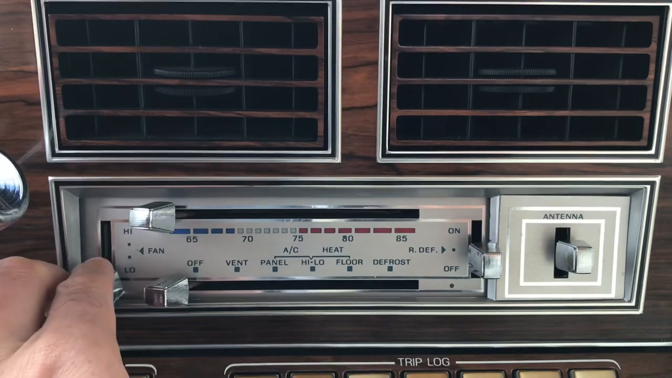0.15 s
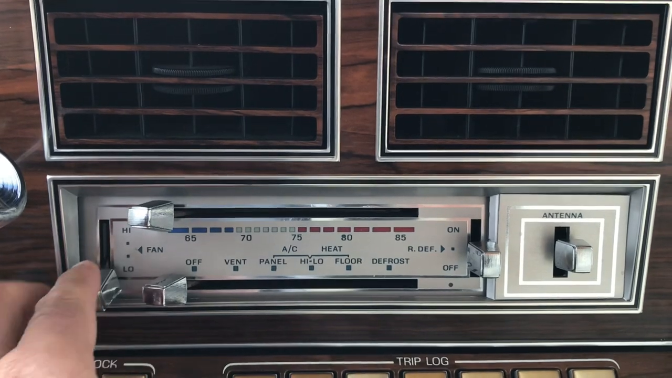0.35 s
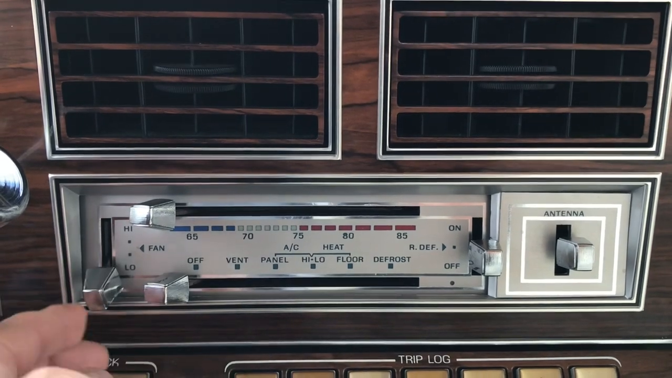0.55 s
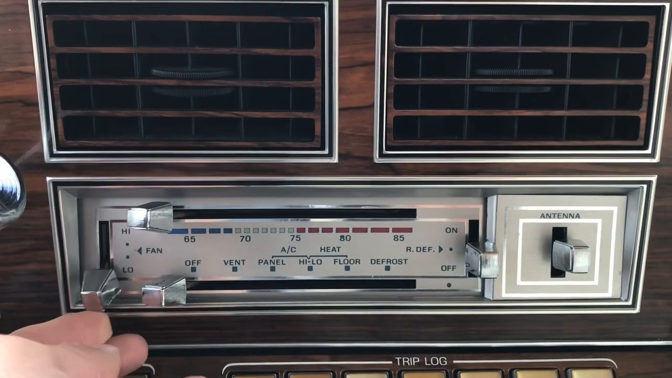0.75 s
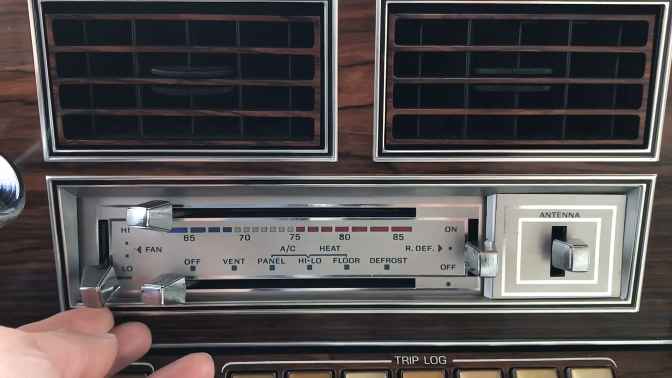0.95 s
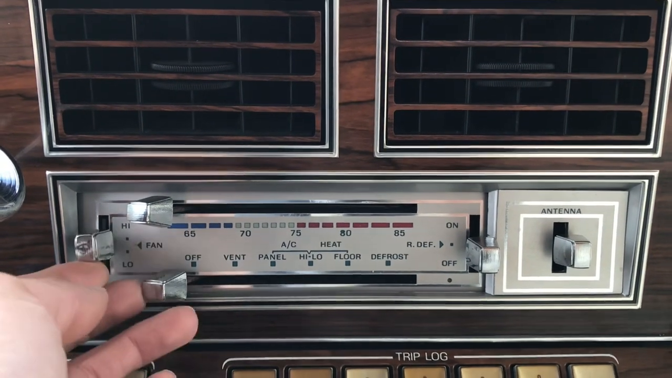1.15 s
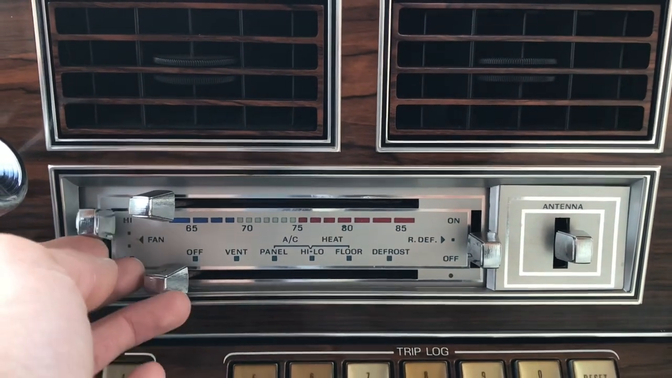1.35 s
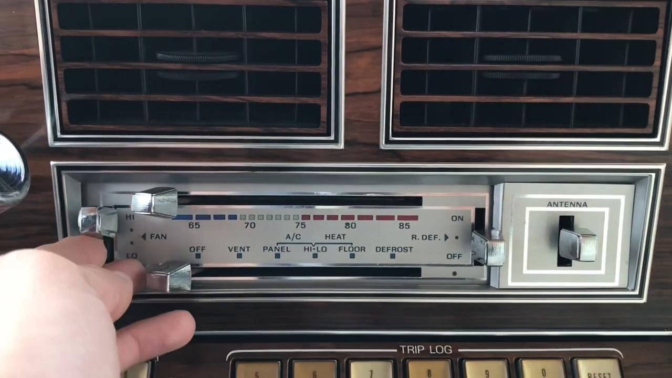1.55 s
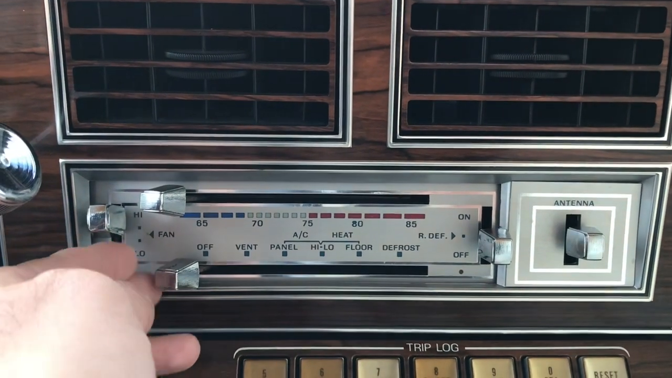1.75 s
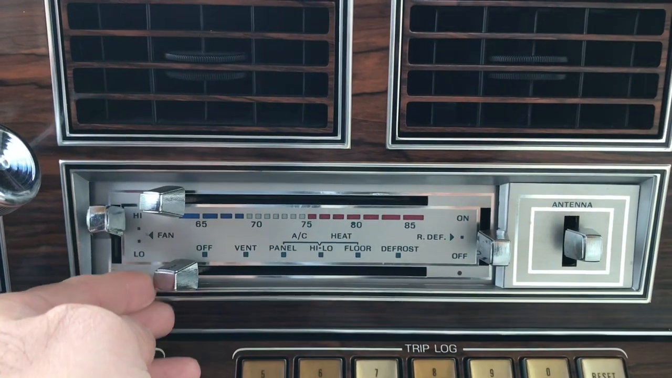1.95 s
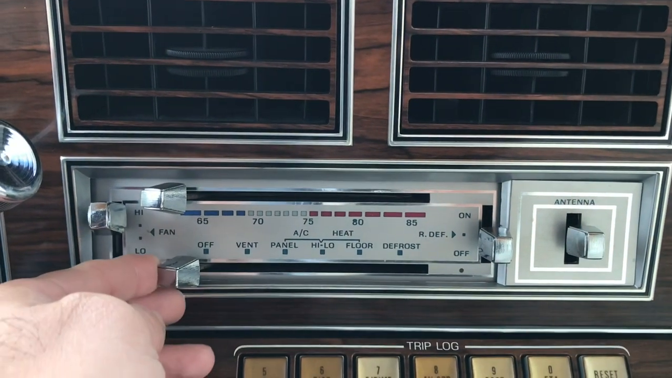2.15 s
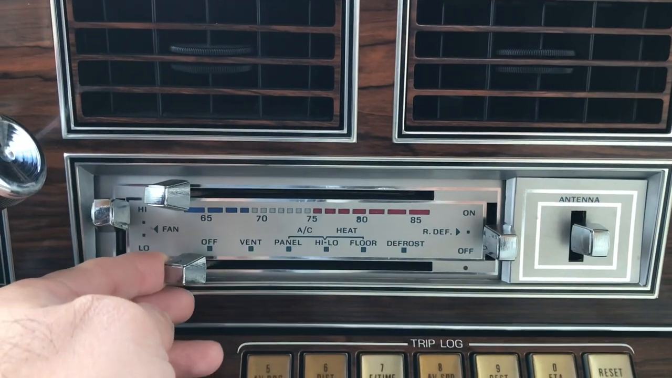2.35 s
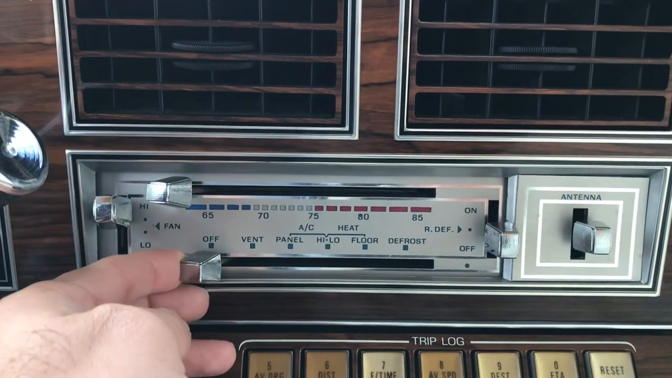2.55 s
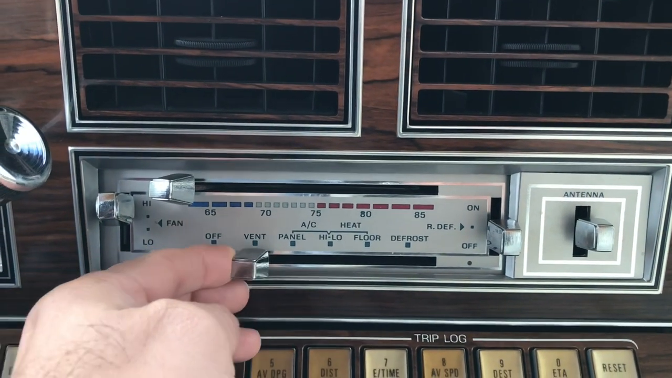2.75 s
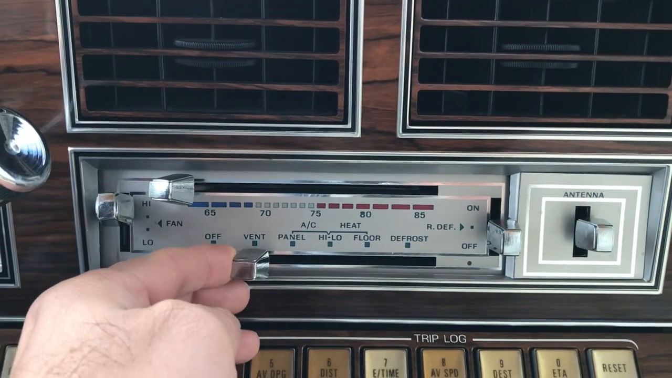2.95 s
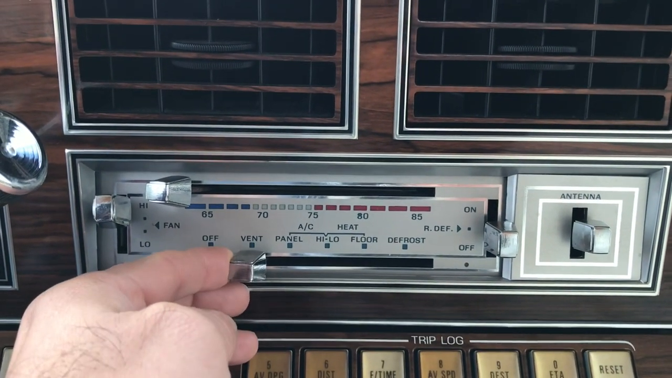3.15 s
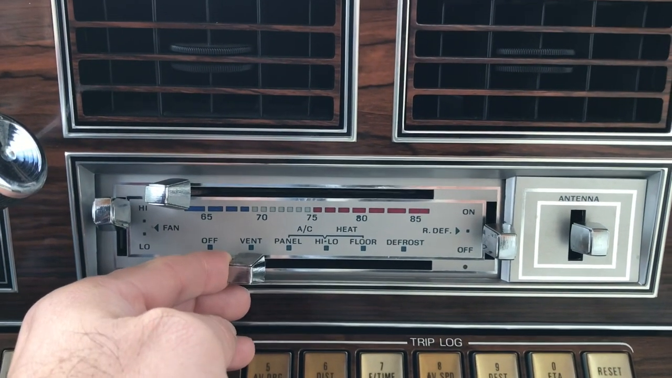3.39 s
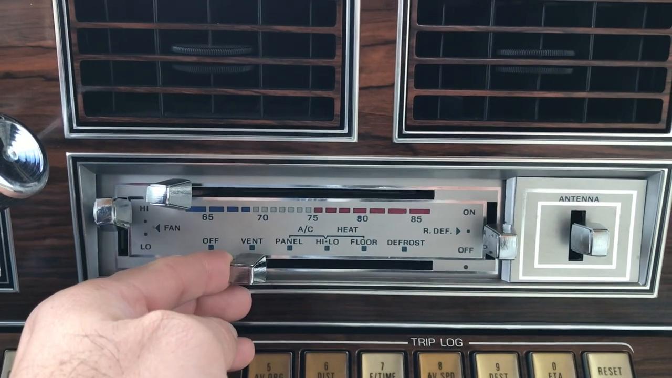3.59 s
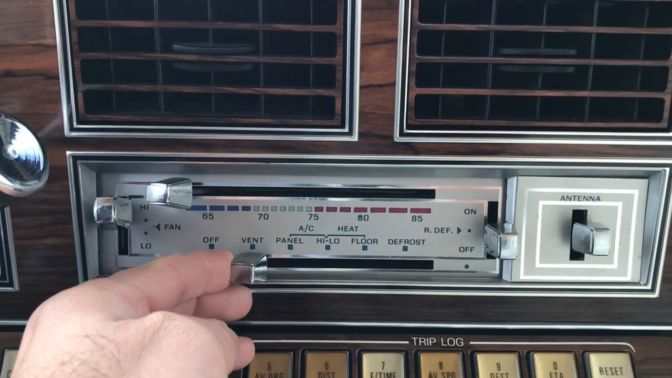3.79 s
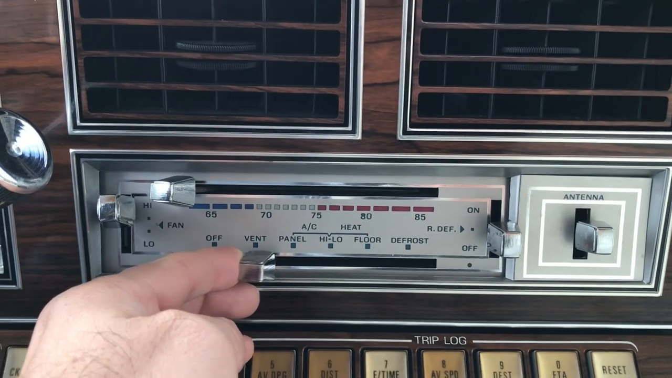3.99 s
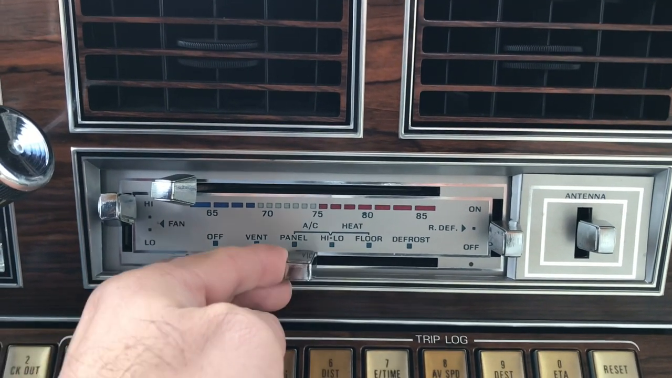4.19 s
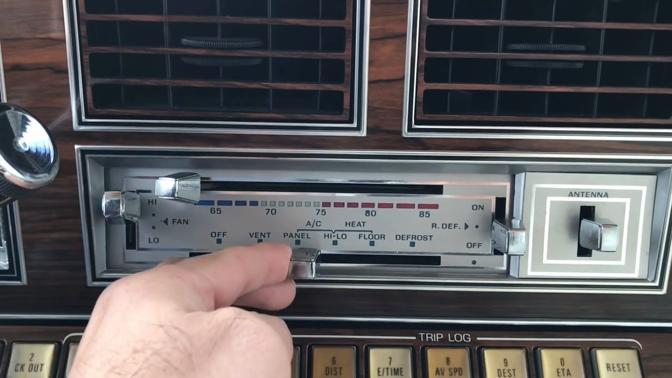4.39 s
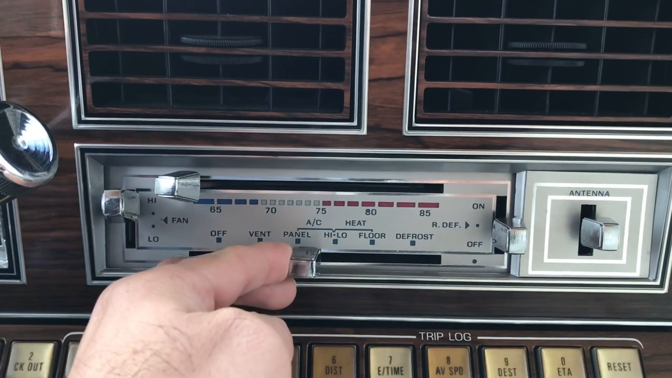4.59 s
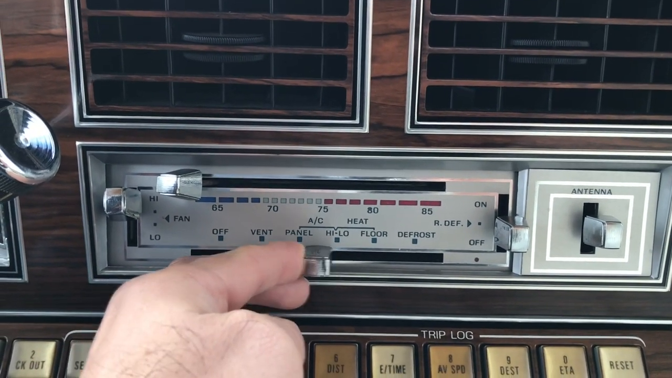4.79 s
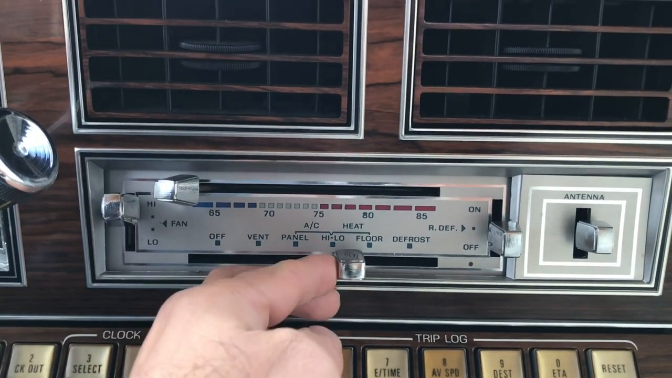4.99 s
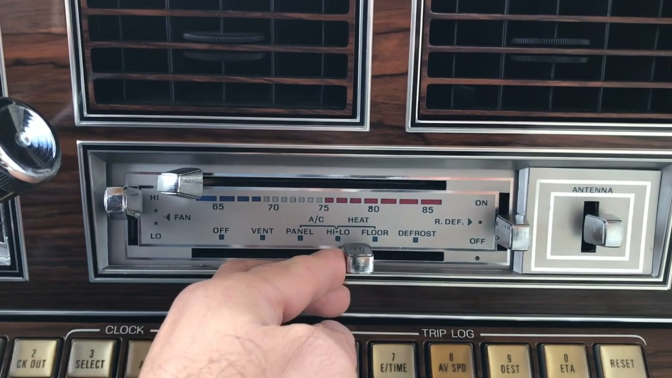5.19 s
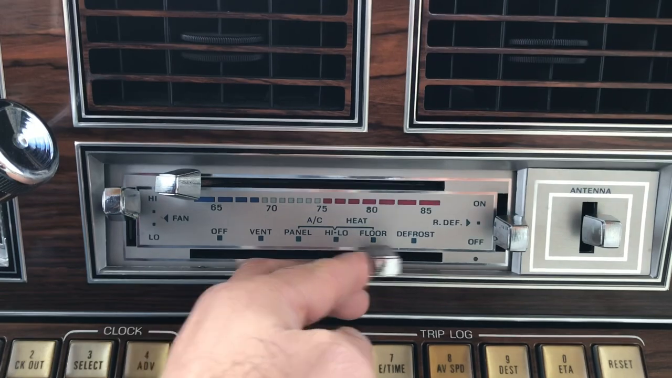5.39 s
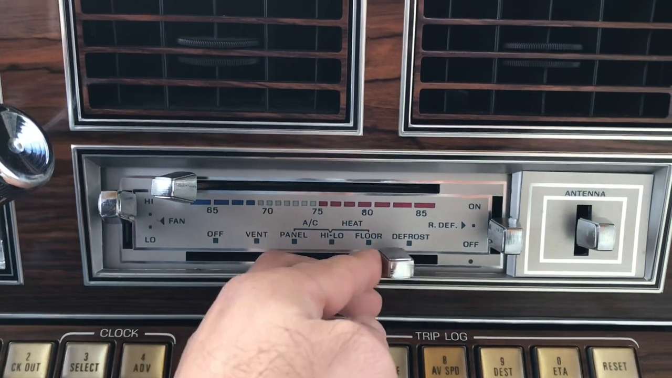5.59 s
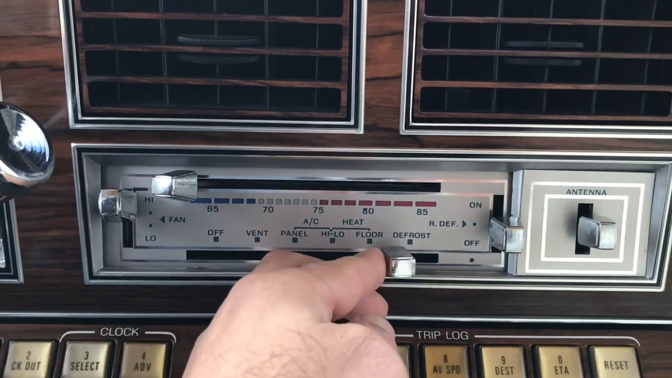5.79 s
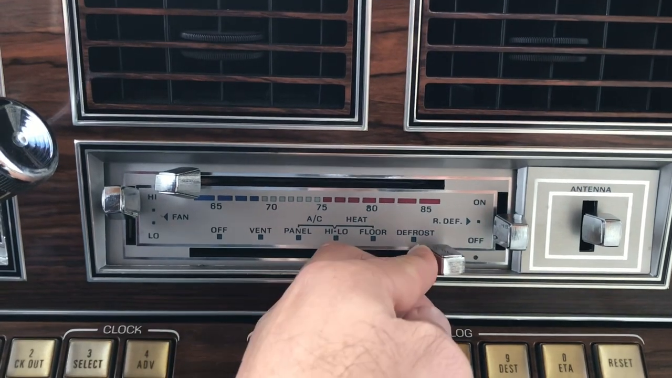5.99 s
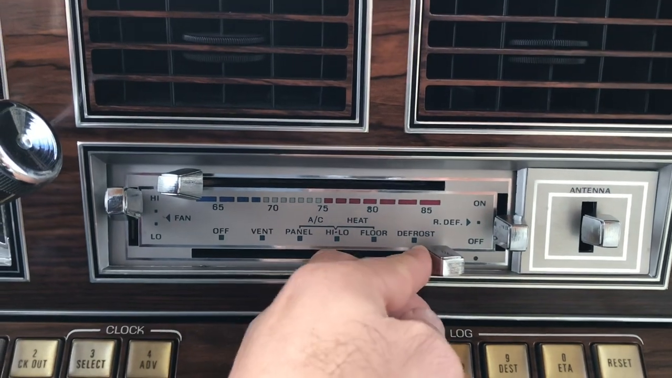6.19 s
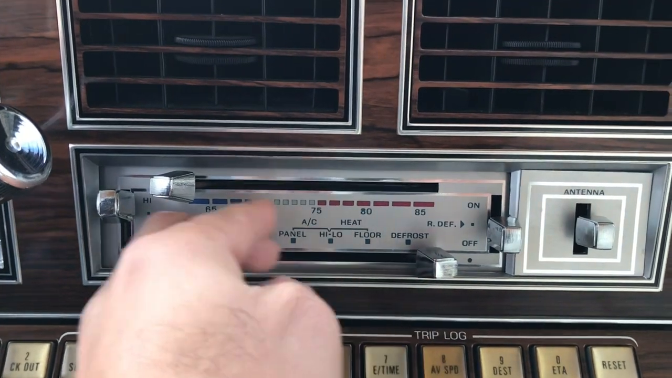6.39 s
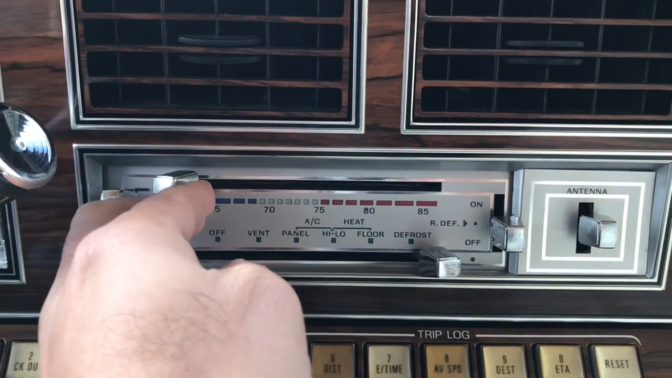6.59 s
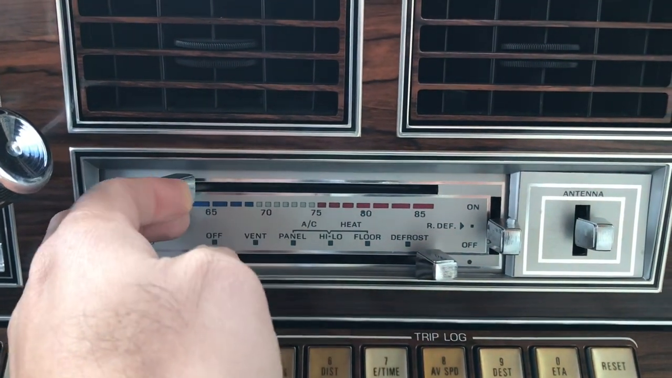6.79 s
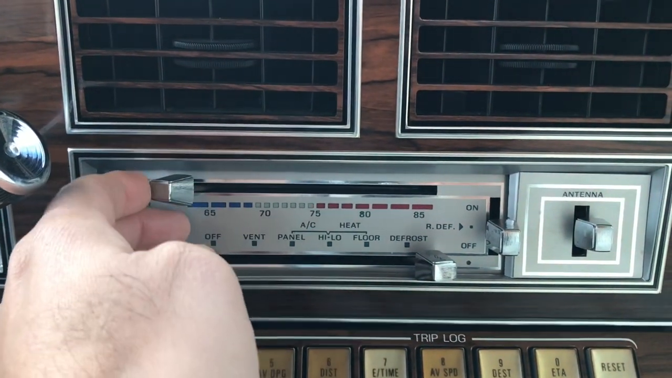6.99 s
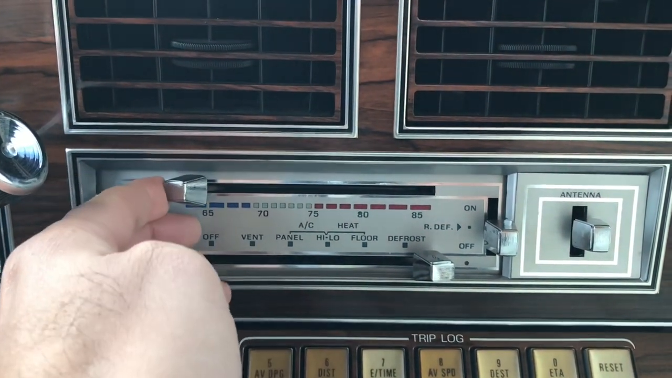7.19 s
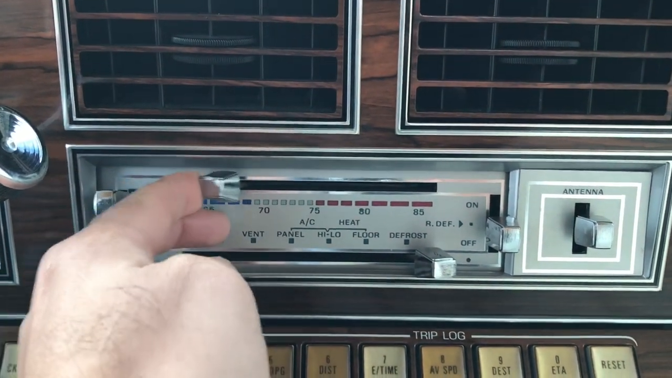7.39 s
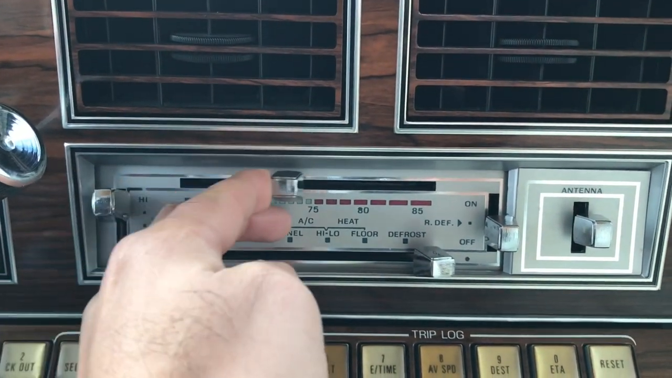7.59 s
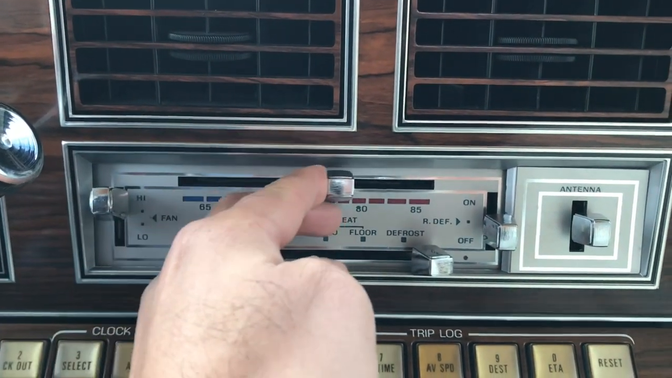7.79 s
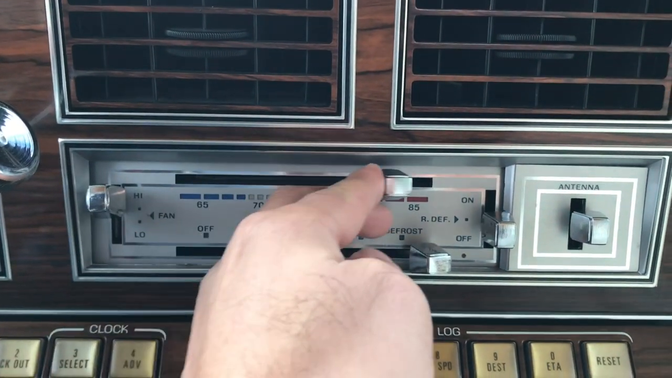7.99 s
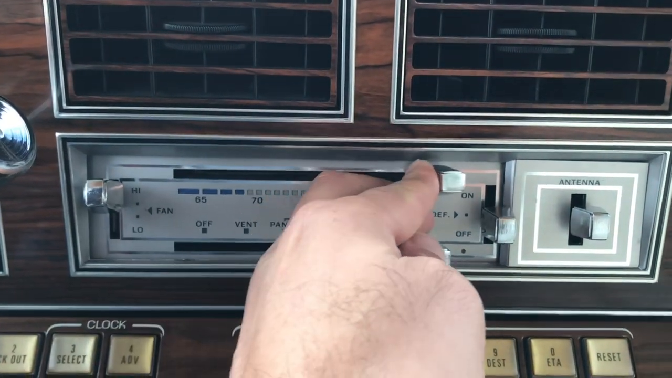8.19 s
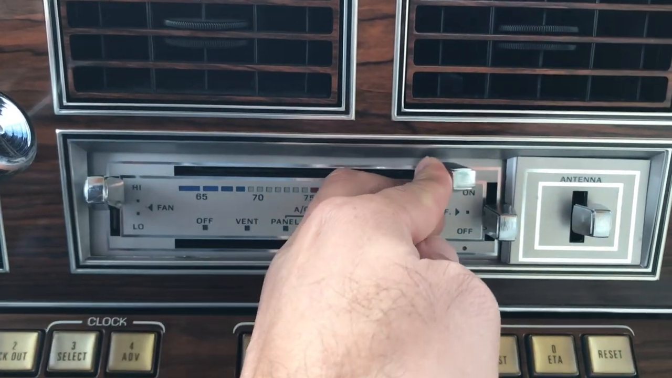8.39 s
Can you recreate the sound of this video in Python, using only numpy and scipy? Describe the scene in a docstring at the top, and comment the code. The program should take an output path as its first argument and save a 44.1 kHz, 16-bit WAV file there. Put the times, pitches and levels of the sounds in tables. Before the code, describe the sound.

A hand works chrome slide levers on a dashboard climate panel, heard closely in a small dry cabin. Bright, hard snaps come first, with near quiet between them, then light ticks and pings. The blower fan swells up with padded flap thumps, settling into a rumbling airflow. Spaced lever clicks, faint scrapes and a final dull knock are heard over it.

```python
"""Sharp snaps, small clicks, chrome pings and soft thumps, then steady rushing air in a closed car cabin.
These are slide levers on a climate panel, heard close up. Snaps and clicks are short noise bursts,
struck metal is a set of dying sine waves, and air doors are short low booms.
Scrapes and creaks are noise broken up by uneven slips. The blower is shaped noise that grows
as the fan spins up, and it runs on while the temperature lever glides across."""
import sys
import numpy as np
from scipy import signal
from scipy.fft import irfft, next_fast_len
from scipy.io import wavfile
from scipy.ndimage import uniform_filter1d

SR = 44100
rng = np.random.default_rng(int(sys.argv[2]) if len(sys.argv) > 2 else 0)


def generate_wav(sig):
    """Save sig (samples, or channels by samples) to the path in sys.argv[1] as 16-bit PCM at SR."""
    pcm = np.round(np.clip(np.atleast_2d(sig).T, -1, 1) * 32767).astype(np.int16)
    wavfile.write(sys.argv[1], SR, pcm)


N = 372644
AGE = np.arange(2 ** 14) / SR  # seconds since a blow

# spectrum shared by detent clicks and the scrape before a snap: [f/Hz, relative level/dB]
DETENT_SPECTRUM = [(200, -12), (700, -5.5), (1500, -4.5), (2600, 3), (3700, -3.5), (4500, 4), (6000, -4.5),
                   (7800, -2.5), (9000, -0.5), (10500, -5.5), (12000, -6), (16000, -9)]
# spectrum of the shaken dashboard: [f/Hz, relative level/dB]
DASH_SPECTRUM = [(100, -16.5), (220, -4.5), (430, -7.5), (700, -4.5), (1000, -0.5), (1900, 3), (2600, -0.5),
                 (4200, -0.5), (6500, -8.5), (8000, -8.5), (12000, -12.5), (16000, -11.5)]
# spectrum of low thuds in the dashboard and ducts: [f/Hz, relative level/dB]
THUD_SPECTRUM = [(25, -20), (60, -2.5), (120, -0.5), (160, -12), (225, 1), (290, -1.5), (430, -16),
                 (600, -7.5), (1200, -33), (4000, -58)]
# resonances and dips of the face plate that colour the clicks: [f/Hz, width/Hz, height/dB]
FACE_PEAKS = [(1120, 66, 2), (1410, 220, -2.5), (1770, 140, 3.5), (2543, 210, 7), (3000, 160, -3.5),
              (3180, 240, 7.5), (3900, 200, -2), (4350, 170, 2), (4840, 180, -7), (5200, 280, 4),
              (5530, 290, -8.5), (6140, 220, 4), (6450, 600, 2.5), (7800, 400, -5), (8300, 200, 4.5),
              (9400, 500, 2.5), (11100, 400, 0.5), (11850, 250, 6.5), (12500, 600, -4.5), (15500, 350, 0)]
# time to fade by 60 dB in dashboard and cabin, before any length factor: [f/Hz, fade/s]
FADE_TIMES = [(60, 0.35), (120, 0.46), (240, 0.05), (500, .1), (1000, 0.087), (2500, 0.067), (6000, 0.082),
              (16000, 0.071)]


def fan_switch():
    """The sprung contact scrapes over its crest, snaps, rings the face plate and shakes the dashboard."""
    # snaps; level is before the contact/dashboard balance:
    # [t/s, level/dB, brightness/(dB per octave), plate ring/dB, thud/dB]
    snaps = [(0.0410, -14.5, 2.5, -19, -32), (0.057, -14, 1.5, -24, -37.5), (0.0641, -14, 0.7, -19, -29.5),
             (1.2023, -14.5, -0.5, -28, -33.5), (1.2235, -15.5, -1.5, -29, -33),
             (1.4055, -14.5, 1, -39, -29)]
    # spectrum of the snapping contact: [f/Hz, relative level/dB]
    snap_spectrum = [(200, -29), (650, -22), (1200, -7), (2000, -3), (3000, -1), (4500, 0.5), (6200, -0.5),
                     (7800, -5.5), (10000, -6.5), (12000, -2), (13500, -8.5), (16000, -3.5)]
    # ringing modes of the switch and its metal plate: [f/Hz, relative level/dB]
    plate_modes = [(700, -12.5), (800, -4), (940, -3), (1000, -6), (1135, 3), (1200, -3.5), (1620, -5.5),
                   (1685, 0), (2507, 3), (2570, -7), (3140, -4), (3235, -6), (3900, -3), (4035, 0),
                   (4650, -5), (5100, -1), (5378, -1), (5900, -2), (5950, -1.5), (6400, -6.5), (6772, -7.5),
                   (8450, -7.5), (9590, -7), (10190, -9.5), (12050, -8.5), (15500, -8)]
    crest_lead_s, crest_db = 0.004, -24.5  # scrape before the snap, level relative to it
    out = np.zeros(N)
    modes = [(hz, db, 0.9 * read(FADE_TIMES, hz)) for hz, db in plate_modes]
    for s, db, tilt_db, plate_db, thud_db in snaps:
        contact = crack(snap_spectrum, tilt_db, rise=0.0014, life=0.0022, peaks=FACE_PEAKS)
        dash = tail(DASH_SPECTRUM, tilt_db, rise=0.0013, peaks=FACE_PEAKS)
        scrape = crack(DETENT_SPECTRUM, -1, rise=0.003, life=0.005, peaks=FACE_PEAKS)
        add(out, s - crest_lead_s, amp(db + crest_db) * scrape)
        add(out, s, amp(db) * (amp(4.0) * contact + amp(-7.5) * dash))
        add(out, s, amp(plate_db) * ring(modes, rise=0.00049, vary_db=2.5))
        add(out, s, amp(thud_db) * tail(THUD_SPECTRUM, 0, rise=0.014))
    return out


def detent_clicks():
    """A lever drops into a detent with a click, and the linkage knocks behind it a moment later."""
    # [t/s, click level/dB, brightness/(dB per octave), knock level/dB, knock pitch/Hz]
    detents = [(1.0515, -50.5, -4, -39, 1120), (1.6432, -55, 8, -41, 1170), (1.8151, -50, 1, -68, 935),
               (2.5159, -44.5, -8, -49, 890), (2.8129, -43.5, -6, -54, 1020), (2.822, -43.5, -16, -54, 980),
               (2.8418, -35, -5.5, -44.5, 740), (4.2144, -34.5, -2, -38, 1110),
               (4.27, -44, -5.5, -50, 1000), (4.9334, -33.5, 2, -33, 830), (4.9945, -34.5, -10, -34, 1450),
               (5.5097, -35.5, 1.3, -34.5, 890), (6.051, -51.5, 1, -33, 960),
               (6.5828, -50, -1.5, -41.5, 1000), (7.242, -32, 4, -32.5, 904),
               (8.3461, -38, -15.5, -28.5, 976)]
    knock_lag_s = 0.00188
    out = np.zeros(N)
    for s, db, tilt_db, knock_db, hz in detents:
        contact = crack(DETENT_SPECTRUM, tilt_db, rise=0.00052, life=0.0024, peaks=FACE_PEAKS)
        after = tail(DETENT_SPECTRUM, tilt_db - 0.8, rise=0.0016, length=0.67, peaks=FACE_PEAKS)
        add(out, s, amp(db) * (contact + amp(-1.5) * after))
        add(out, s + knock_lag_s, knock(knock_db, hz))
    return out


def knob_taps():
    """A chrome knob lightly taps its slot: a tick and a ping, then a knock from the linkage."""
    # [t/s, ring level/dB, tick level/dB, tick brightness/(dB per octave), knock level/dB, knock pitch/Hz]
    taps = [(2.3690, -27.5, -33, 4.5, -51.5, 1095), (2.4877, -24.5, -36, 2, -31.5, 1185),
            (7.2423, -50, -30.5, 3.5, -30, 1616), (7.352, -48.5, -52, -9, -50, 1390),
            (7.524, -47, -46, -6, -55, 990), (7.8531, -34, -33.5, -5, -47, 1000)]
    # ringing modes of a knob: [f/Hz, relative level/dB, time to fade by 60 dB/s]
    knob_modes = [(4620, -2, 0.012), (4650, -5, 0.013), (5100, 4.5, 0.016), (4860, -16, 0.0065),
                  (6540, -17, 0.028), (7720, -17, 0.061), (9630, -3, 0.015), (11260, -12, 0.023),
                  (14100, -11, 0.042), (15100, -16, .04), (15200, -13, .045)]
    # spectrum of the contact tick: [f/Hz, relative level/dB]
    tick_spectrum = [(1000, 12), (3500, -23), (4800, -14), (6500, 12.5), (9300, 3), (10500, -9),
                     (12000, -12), (15000, 10)]
    knock_lag_s = 0.0045
    out = np.zeros(N)
    for s, ring_db, tick_db, tilt_db, knock_db, hz in taps:
        tick = crack(tick_spectrum, tilt_db, rise=0.00098, life=0.0014)
        dash = tail(DASH_SPECTRUM, 1.7, rise=0.002, length=0.93, peaks=FACE_PEAKS)
        ping = ring(knob_modes, rise=0.00066, vary_db=7)
        add(out, s, amp(ring_db) * (ping + amp(-21) * dash) + amp(tick_db) * tick)
        add(out, s + knock_lag_s, knock(knock_db, hz))
    return out


def slack_knocks():
    """A lever takes up its slack or meets its stop, and the linkage knocks."""
    # [t/s, level/dB, main pitch/Hz]
    knocks = [(0.0661, -21.5, 1490), (0.071, -29, 764), (0.412, -51.5, 1160), (0.882, -56.5, 1190),
              (1.022, -54.5, 1186), (1.056, -44, 556), (1.237, -33, 864), (1.409, -25, 570),
              (1.760, -52, 1150), (4.9362, -40, 2670)]
    out = np.zeros(N)
    for s, db, hz in knocks:
        add(out, s, knock(db, hz))
    return out


def knock(db, hz):
    """The hollow linkage rings behind the panel."""
    # ringing modes of the linkage: [multiple of the main pitch, relative level/dB, time to fade by 60 dB/s]
    linkage_modes = [(.62, -6, 0.04), (.9, -6.5, 0.058), (1, 1, 0.05), (1.12, -5, .04), (1.3, -23, 0.09),
                     (1.47, -6, 0.028), (1.77, -20, 0.049)]
    # spectrum of the panel's answer: [f/Hz, relative level/dB]
    knock_spectrum = [(100, -9), (300, 5), (600, -2), (1100, 0), (1800, -6.5), (3000, -11), (6000, -28),
                      (16000, -42)]
    hollow = ring(linkage_modes, rise=0.0015, pitch=hz, vary_db=1.5)
    return amp(db) * (hollow + amp(-6) * tail(knock_spectrum, 0, rise=0.002, length=0.85))


def rubbing():
    """A moving lever scrapes its slot in fine, uneven slips: short pushes, and one long glide."""
    # friction builds as a lever is pushed, until it gives way: [t when it gives/s, level/dB, build-up/s]
    rubs = [(2.85, -57, 0.091), (4.215, -51.5, .04), (4.941, -46.5, 0.028), (5.52, -52.5, 0.049),
            (6.045, -53, 0.056), (7.529, -55.5, 0.07), (7.85, -63, 0.083)]
    # spectrum of the scrape: [f/Hz, relative level/dB]
    rub_spectrum = [(200, -14), (1000, 20), (2000, 1), (5000, 5), (7000, -1.5), (9000, 0.5), (10500, -4.5),
                    (12500, -2), (14000, -8), (15000, -2), (16000, -13)]
    # resonances of the long glide: [f/Hz, width/Hz, height/dB]
    slide_peaks = [(9400, 1200, 3), (15100, 900, 4)]
    slips = amp(2.6 * unit(uniform_filter1d(rng.standard_normal(N), size=90)))
    pushes = sum(amp(db) * envelope(s, build, 0, release=0.012) for s, db, build in rubs)

    # the temperature lever has no detents; finger pressure varies slowly along its stroke
    slide_db, uneven_db = -64, 2.5
    grip = noise([(1, 0), (6, 0), (15, -20), (60, -80), (400, -120)], N)
    stroke = envelope(7.52, attack=0.05, hold=0.71, release=0.13)
    glide = amp(slide_db + uneven_db * grip) * stroke

    push_scrape = unit(slips * noise(rub_spectrum, N))
    glide_scrape = unit(slips * noise(rub_spectrum, N, peaks=slide_peaks))
    return pushes * push_scrape + glide * glide_scrape


def creak(slip_hz=110):
    """The fan lever creaks under the finger: quick, uneven slips pulse noise with its resonances."""
    # the finger leans on the lever or lets go: [t/s, level/dB, attack/s, hold/s]
    creaks = [(1.202, -59.5, .016, .005), (1.82, -53.5, .004, 0.033)]
    # resonances of the creak: [f/Hz, width/Hz, height/dB]
    creak_peaks = [(960, 100, 19), (1256, 220, 5.5), (1720, 150, 11.5), (2300, 200, -2.5),
                   (3240, 400, 13.5)]
    wander = unit(uniform_filter1d(rng.standard_normal(N), size=300))
    turns = np.cumsum(slip_hz * (1 + 0.26 * wander)) / SR
    slips = unit(0.5 + np.exp(-(turns % 1) / 0.3))
    spectrum = [(200, 6), (700, -3.0), (1200, 3.5), (3300, -6.0), (6000, -11.0), (12000, -16.5)]
    body = noise(spectrum, N, peaks=creak_peaks)
    pressure = sum(amp(db) * envelope(s, attack, hold, release=0.024) for s, db, attack, hold in creaks)
    return pressure * slips * body


def air_doors():
    """Each padded flap lands with a soft boom in the ducts."""
    # level is before the boom/thud balance: [t/s, level/dB, pitch/Hz]
    doors = [(2.758, -40.5, 99), (2.892, -39.5, 99), (2.943, -37, 107), (3.157, -36.5, 80.5),
             (3.197, -32, 58)]
    out = np.zeros(N)
    for s, db, hz in doors:
        boom = np.sin(2 * np.pi * hz * AGE) * (1 - np.exp(-AGE / 0.0056)) * np.exp(-AGE / 0.017)
        thud = tail(THUD_SPECTRUM, -1.7, rise=0.0049)
        add(out, s, amp(db) * (amp(11.0) * boom + amp(-12.5) * thud))
    return out


def blower(level_db=-34, flutter_db=0.9, rush_db=-0.5):
    """The fan gathers speed; its rush grows with speed more steeply than its rumble."""
    # spectrum of the moving air: [f/Hz, relative level/dB]
    air_spectrum = [(25, -37), (45, -15.5), (60, 0.5), (100, -1.5), (145, -10.5), (220, -10.5),
                    (330, -17.5), (470, -29), (700, -28.5), (1100, -29.5), (2400, -36), (3300, -44),
                    (6500, -51.5), (8000, -59), (16000, -71.5)]
    # cabin and duct resonances and dips: [f/Hz, width/Hz, height/dB]
    duct_peaks = [(121.3, 6.1, 10), (176.5, 6.1, -7.5), (201.9, 30.3, 6.5), (237.2, 7.8, 5.5),
                  (252, 17.4, -6), (292, 13, 3), (389.4, 11.5, 4), (575, 270, 10), (852, 27, 4.5),
                  (1786, 32, -10), (1940, 64, 6.5), (2210, 47, 6.5), (4400, 280, 1), (12400, 580, 8)]
    on_s, spin_up_s, creep_per_s = 2.793, 0.41, 0.006  # it keeps creeping faster after the run-up
    running = np.maximum(np.arange(N) / SR - on_s, 0)
    speed = np.tanh(running / spin_up_s) * (1 + creep_per_s * running)
    air = noise(air_spectrum, N, peaks=duct_peaks)
    rumble = signal.sosfiltfilt(signal.butter(2, 350, fs=SR, output="sos"), air)
    eddies = noise([(1, 0), (8, -3), (30, -12), (100, -40), (400, -100)], N)  # slow flutter
    rush = (air - rumble) * amp(rush_db + flutter_db * eddies)
    return amp(level_db) * (rumble * speed ** 1.6 + rush * speed ** 3)


def cabin():
    """Faint outside noise, booming in the cabin's lowest air mode, with one swell of the boom."""
    # spectrum of the faint steady noise: [f/Hz, relative level/dB]
    quiet_spectrum = [(25, -11.5), (50, -3), (70, -1.5), (120, -3), (160, -10), (300, -16.5), (500, -24.5),
                      (900, -25), (1600, -33.5), (4000, -37), (9000, -39.5), (10500, -43), (12500, -35.5),
                      (16000, -37.5)]
    rumble_db, swell_db = -65, 9.5
    boom = noise([(20, -50), (55, -18), (70, 0), (85, -16), (200, -60), (1000, -110)], N)
    swell = envelope(1.2, attack=0.13, hold=1.1, release=0.13)
    return amp(-59.0) * noise(quiet_spectrum, N) + amp(rumble_db + swell_db * swell) * boom


def crack(colour, tilt_db, rise, life, peaks=()):
    """The contact itself: a burst of noise a few milliseconds long."""
    shape = (1 - np.exp(-(AGE / rise) ** 2)) * np.exp(-AGE / life)
    return noise(colour, len(AGE), tilt_db, peaks) * shape / shape.max()


def tail(colour, tilt_db, rise, length=1, peaks=()):
    """Noise for countless panel modes and cabin reflections; each pitch fades at its own rate."""
    hz, t, z = signal.stft(noise(colour, len(AGE), tilt_db, peaks), SR, nperseg=256)
    t60 = length * read(FADE_TIMES, hz)[:, None]
    z = z * np.exp(-np.log(1000) * t / t60)
    return signal.istft(z, SR)[1][:len(AGE)] * (1 - np.exp(-AGE / rise))


def ring(modes, rise, pitch=1, vary_db=2):
    """Dying sine waves; each blow lands a little differently and shares its energy anew."""
    hz, db, t60 = np.transpose(modes)[:, :, None]
    size = amp(db + vary_db * rng.standard_normal(db.shape))
    waves = np.sin(2 * np.pi * (hz * pitch * AGE + rng.random(hz.shape)))
    dying = waves * np.exp(-np.log(1000) * AGE / t60)
    total = (size * dying).sum(0) / np.sqrt((size ** 2).sum() / 2)
    return total * (1 - np.exp(-AGE / rise))


def noise(colour, size, tilt_db=0, peaks=()):
    """Noise of rms 1 with a spectrum, resonances, and a tilt per octave well above 500 Hz."""
    padded = 2 * next_fast_len(size // 2 + 1, True)
    hz = np.fft.rfftfreq(padded, 1 / SR)
    db = read(colour, hz) + tilt_db * np.log2(1 + hz / 500)
    for centre, width, height in peaks:
        db = db + height / (1 + (2 * (hz - centre) / width) ** 2)
    random_phase = np.exp(2j * np.pi * rng.random(len(hz)))
    return unit(irfft(amp(db) * random_phase, padded)[:size])


def envelope(s, attack, hold, release):
    """Grows exponentially to 1 at s, holds, then dies away."""
    t = np.arange(N) / SR - s
    growth = np.minimum(t, 0) / attack
    decay = np.maximum(t - hold, 0) / release
    return np.exp(np.maximum(growth - decay, -30))


def amp(db):
    """Turns decibels into a loudness factor."""
    return 10 ** (np.asarray(db) / 20)


def unit(x):
    """Scales to rms 1."""
    return x / np.sqrt(np.mean(x ** 2) + 1e-20)


def read(points, hz):
    """A table's value at hz, on a log-frequency axis."""
    f, value = np.transpose(points)
    return np.interp(np.log(hz + 1), np.log(f + 1), value)


def add(mix, s, sound):
    """Mixes a sound in at s seconds."""
    part = mix[max(round(s * SR), 0):][:len(sound)]
    part += sound[:len(part)]


def scene():
    """All sources together, in one channel."""
    levers = detent_clicks() + knob_taps() + slack_knocks()
    friction = creak() + rubbing()
    return (fan_switch() + levers + friction + air_doors() + blower() + cabin())[None]


def record(dry, hold=0.415, hiss_db=-61):
    """A loud peak holds the recorder's noise gate open and lets its hiss through; soft overload; band limit."""
    # spectrum of the hiss: [f/Hz, relative level/dB]
    hiss_spectrum = [(100, 17), (300, 9.5), (700, 1.5), (4000, -0.5), (7000, -3), (9500, -4), (10400, -7.5),
                     (11500, -4.5), (16000, -7.5)]
    edge_hz = 16100
    loud = abs(dry[0]) > 0.17
    t = np.arange(N) / SR
    since_loud = t - np.maximum.accumulate(np.where(loud, t, -1))
    gate = uniform_filter1d((since_loud < hold) * 1.0, size=1800)  # smooth edges, 41 ms long
    wet = np.tanh(dry + amp(hiss_db) * gate * noise(hiss_spectrum, N))
    low_pass = signal.firwin(255, edge_hz, window=("kaiser", 8), fs=SR)
    return signal.oaconvolve(wet, low_pass[None], "same")


dry = scene()
out = record(dry)
generate_wav(out)
```